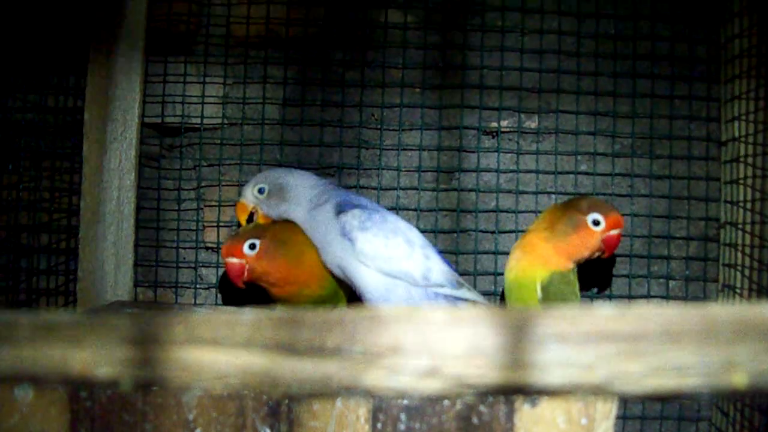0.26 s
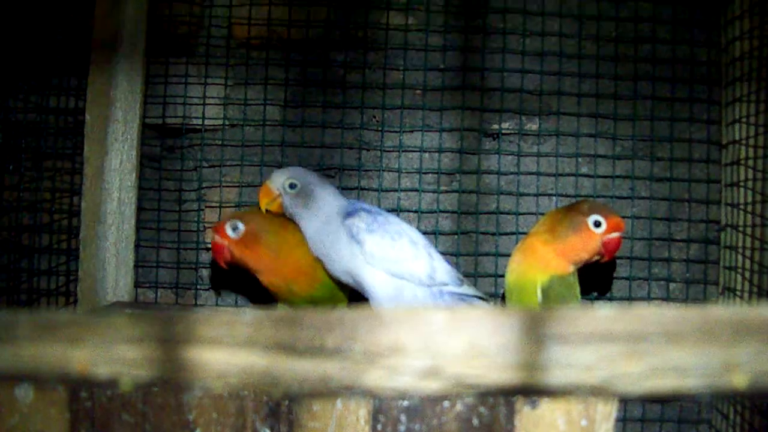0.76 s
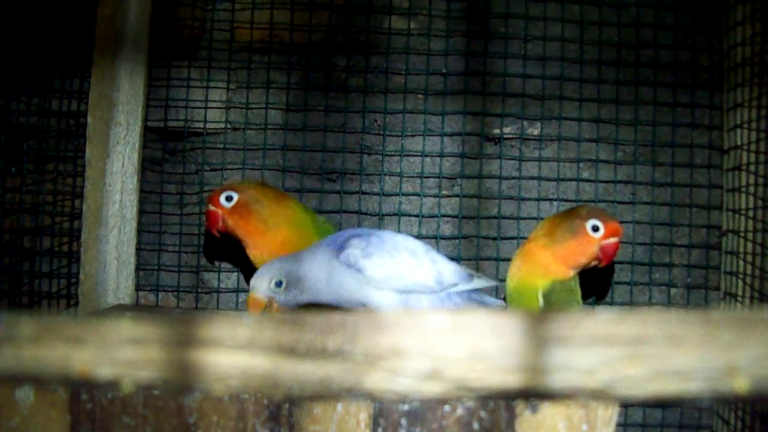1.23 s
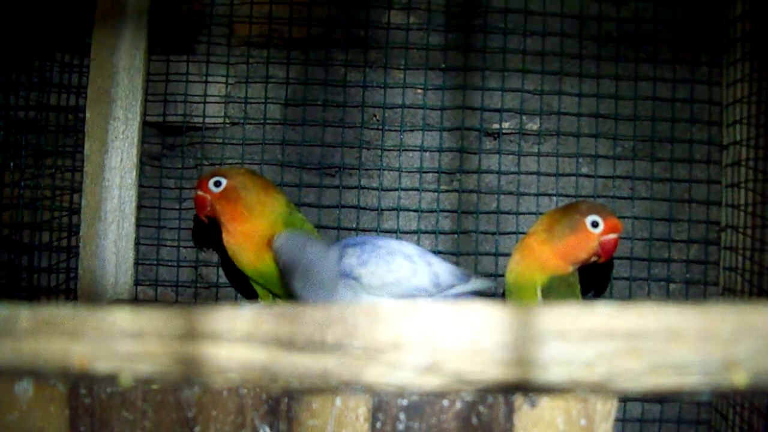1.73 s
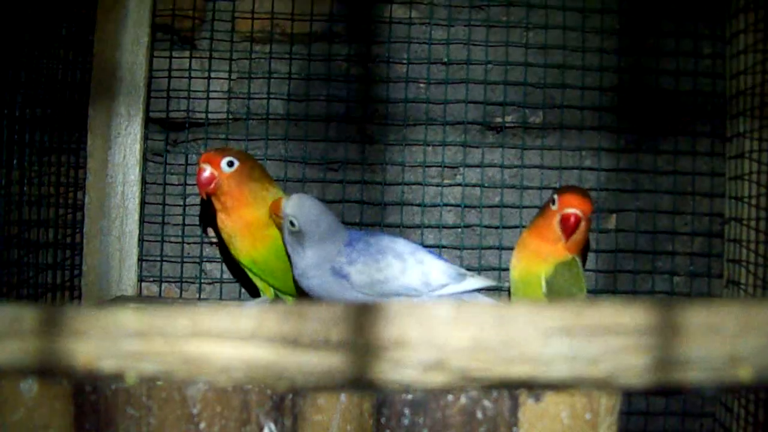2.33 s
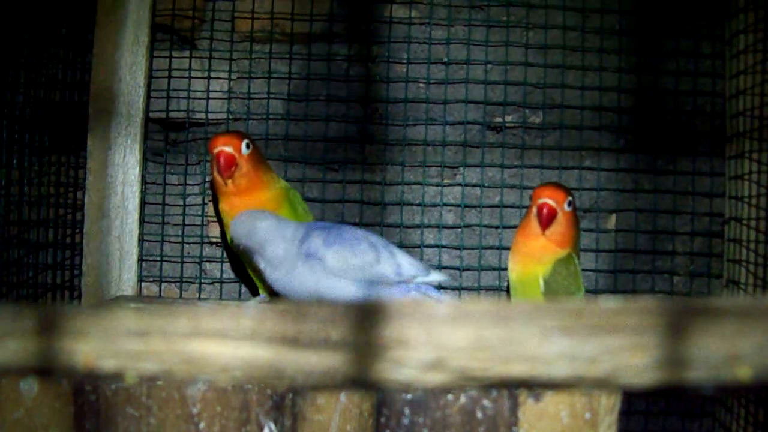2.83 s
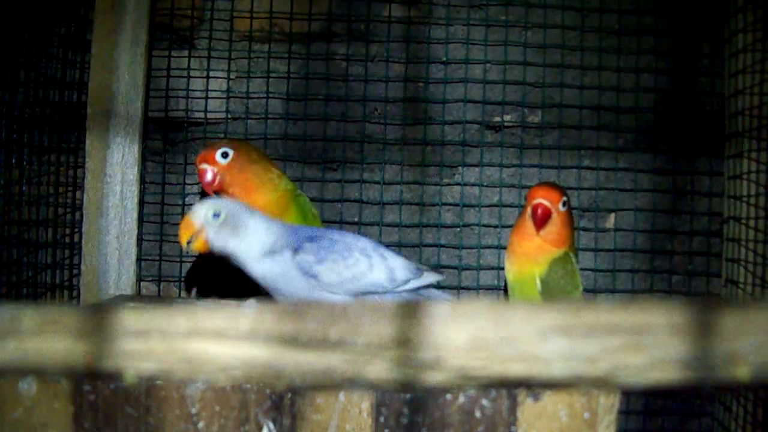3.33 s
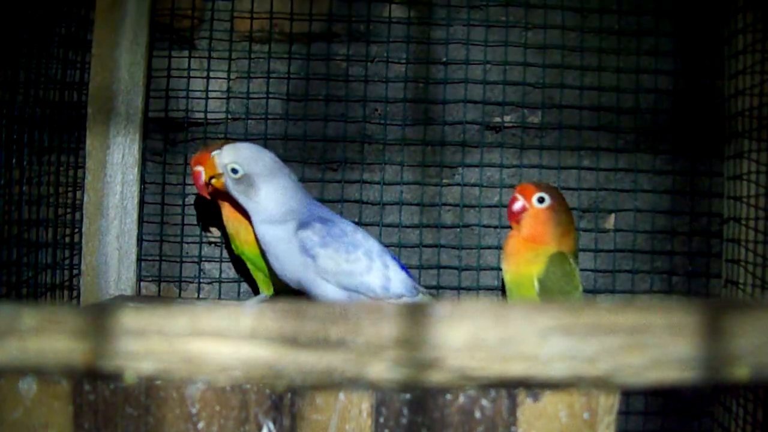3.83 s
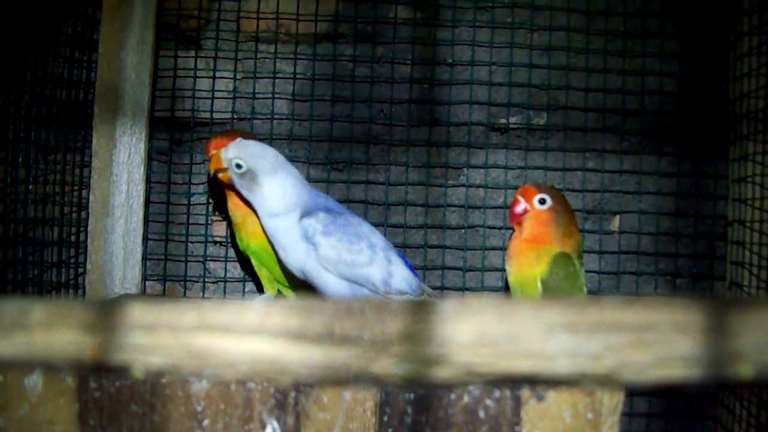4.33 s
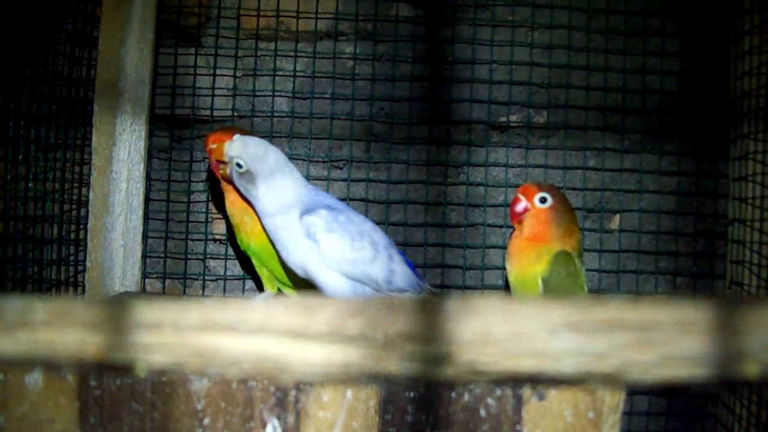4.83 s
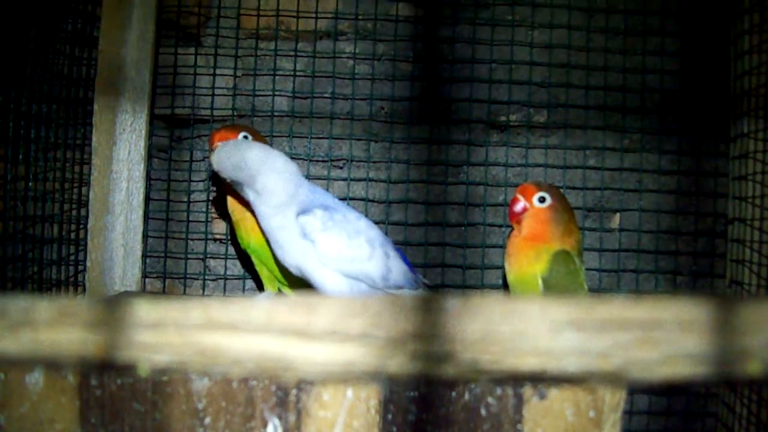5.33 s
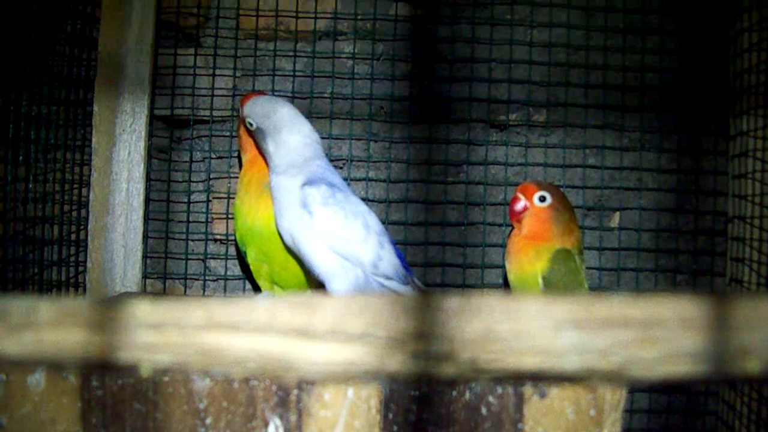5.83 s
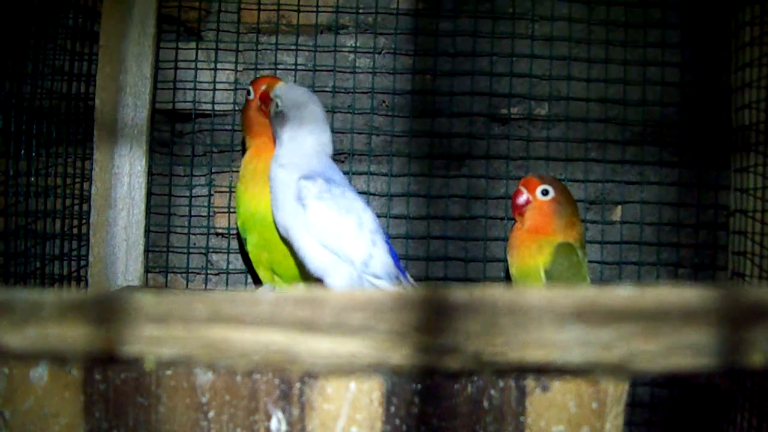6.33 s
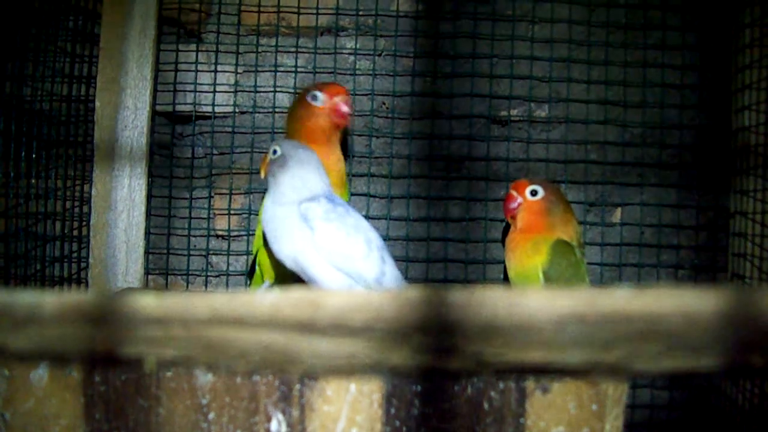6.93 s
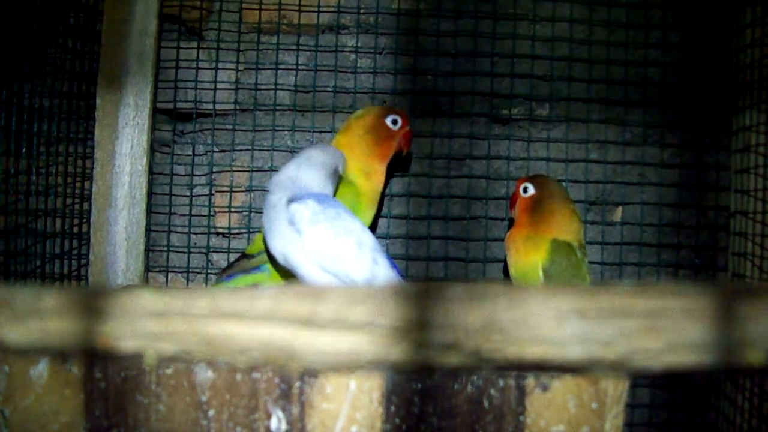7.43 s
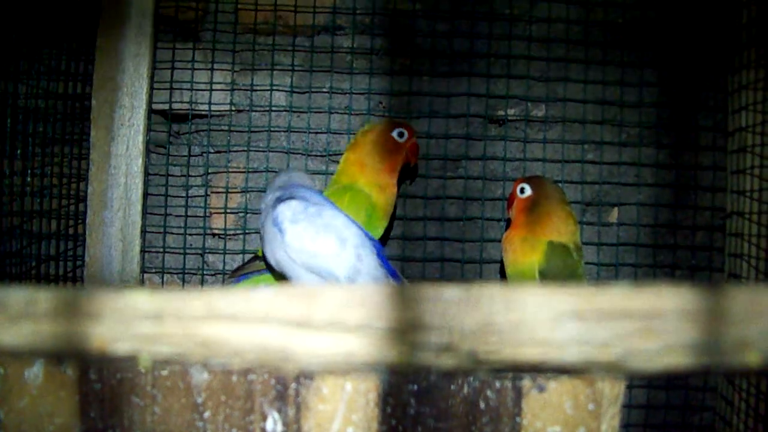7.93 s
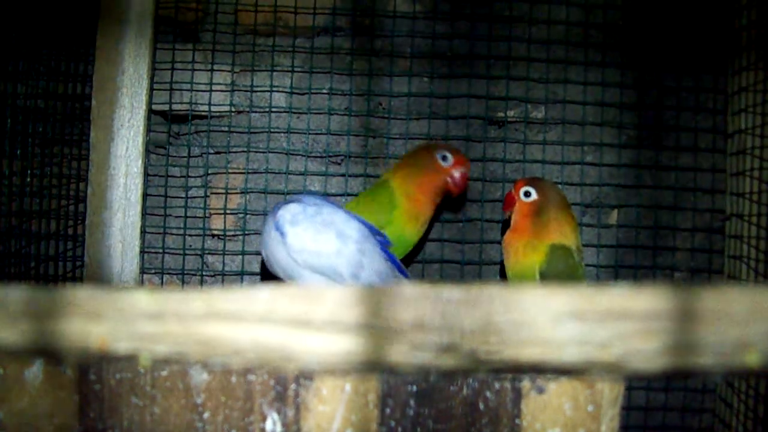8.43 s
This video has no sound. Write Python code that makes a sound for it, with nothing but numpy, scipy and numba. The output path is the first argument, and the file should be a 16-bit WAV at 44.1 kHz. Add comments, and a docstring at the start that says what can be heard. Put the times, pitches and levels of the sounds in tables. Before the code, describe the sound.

A constant airy hiss with a little low rumble fills a small indoor space, swelling gently throughout. From 0 to 0.7 s, lovebirds in a wire cage give quick, overlapping raspy and hoarse chirps, modest in level, around two to four kilohertz. From 0.9 to 1.5 s cleaner chirps and tiny whistles join, one brighter blip near 1.05 s. Then the birds almost fall silent, with faint puffs of rustling and only a weak whistle near 2.85 s. At 4.0 s a small dull knock sounds on the wooden perch, and at 4.1 s a sudden, much louder flurry of shrill, scratchy squeaks bursts out for about 0.25 s. The automatic level dips, softer chirps tumble on until 4.75 s, and the hiss recovers. Sparse faint calls follow near 5.7, 6.3, 6.6, 7.1 and 7.75 s; hiss continues to 8.7 s. Notes have a short room tail and thin camera-microphone colour.

```python
"""Lovebirds chirp in a wire cage indoors; sine partials with unsteady pitch and level make every note. Raspy
and hoarse notes open, pure whistles and chirps join near 1 s, then the birds almost fall silent. A foot knocks
the perch just before a loud flurry at 4.1 s; the camera's gain ducks under it and recovers. Sparse calls close
the scene. Notes ring briefly in the room over a slowly swelling airy hiss of shaped noise, with faint puffs of
high noise: rustling and the blurred treble of distant chatter. A notched microphone and a low sampling rate
with mirror images colour all."""
import sys
import numpy as np
from scipy import signal
from scipy.fft import rfft, irfft, next_fast_len
from scipy.io import wavfile
from scipy.ndimage import uniform_filter1d
from numba import njit

SR = 44100
rng = np.random.default_rng(int(sys.argv[2]) if len(sys.argv) > 2 else 0)


def gain_from_db(level_db):
    """Convert decibel levels to linear amplitude factors (20 dB per decade)."""
    decades = np.asarray(level_db, float) / 20
    return 10 ** decades


def file_out(sig):
    """Save sig as 16-bit WAV at sys.argv[1]."""
    # one column per channel
    cols = np.atleast_2d(sig).T
    # limit, then scale
    lim = np.clip(cols, -1, 1)
    pcm = np.round(lim * 32767).astype(np.int16)
    wavfile.write(sys.argv[1], SR, pcm)


N = 382347


def shape(x, table):
    """Linear filtering: the spectrum is multiplied by a gain interpolated over log frequency (f/Hz, gain/dB)."""
    size = next_fast_len(len(x))
    hz, db = np.transpose(table)
    log_hz = np.log(np.fft.rfftfreq(size, 1 / SR) + 1)
    gain = gain_from_db(np.interp(log_hz, np.log(hz), db))
    return irfft(rfft(x, size) * gain, size)[:len(x)]


def walk(rate_hz, size=N):
    """Low-pass random modulation: values held for 1 / rate, smoothed twice, with a spread near 1."""
    k = int(SR / rate_hz)
    held = np.repeat(rng.standard_normal(size // k + 1), k)
    smooth = uniform_filter1d(uniform_filter1d(held, k), k)
    return 1.464 * smooth[:size]


def syrinx(table, wobble, throb_db, rate_hz, edge_s, breath_db, click_db):
    """Harmonic source: a gliding tone of four partials, modulated in pitch and level, leaks turbulent air."""
    third_db_per_khz, fourth_re_third_db, click_s = -9.5, -5.5, 0.0019
    out = np.zeros(N + SR)
    for s, length, start_hz, end_hz, *levels in table:
        pitch_walk, *level_walks = [walk(rate_hz, size=4096) for _ in range(4)]
        air = np.diff(rng.standard_normal(4097))  # differencing tilts the noise towards the treble
        n = min(int((length + edge_s) * SR), 4096)
        t = np.arange(n) / SR
        hz = np.interp(t, [0, length], [start_hz, end_hz]) * (1 + wobble * pitch_walk[:n])
        phase = 2 * np.pi * np.cumsum(hz) / SR
        # the voice breaks off deeply but swells only a little
        breaks = [np.minimum(c[:n] - 0.45, 0.45) for c in level_walks]
        # the third harmonic weakens as the mean pitch rises, with 2 kHz as reference
        mean_khz = (start_hz + end_hz) / 2000
        levels[2] += third_db_per_khz * (mean_khz - 2)
        levels.append(levels[2] + fourth_re_third_db)
        tone = np.zeros(n)
        for k, db in enumerate(levels):
            tone += gain_from_db(db + throb_db * breaks[k % 3]) * np.sin((k + 1) * phase)
        # air leaks all along and pops as the membrane snaps into the note
        pop = np.exp(-((t - edge_s) / click_s) ** 2)
        leak = gain_from_db(breath_db) + gain_from_db(click_db) * pop
        tone += gain_from_db(max(levels)) * leak * air[:n]
        ramp = np.clip(np.minimum(t, t[-1] - t) / edge_s, 0, 1)
        at = max(int((s - edge_s / 2) * SR), 0)
        out[at:at + n] += np.sqrt(2) * tone * np.sin(ramp * np.pi / 2) ** 2
    return out[:N]


def with_overtones(table, octave_db, third_db):
    """Harmonic spectrum: octave and third harmonic take set levels relative to the fundamental."""
    return [(*row, row[-1] + octave_db, row[-1] + third_db) for row in table]


def clear_notes():
    """Nearly periodic vibration: whistles are almost pure tones, chirps carry a strong octave."""
    # pure whistles: t/s, duration/s, start f/Hz, end f/Hz, fundamental level/dB
    whistle_rows = [(.94, 0.025, 3100, 2852, -42), (1.044, 0.0035, 3520, 3430, -26),
                    (1.063, .007, 3230, 1920, -30.5), (1.069, 0.0095, 2016, 1785, -22),
                    (1.082, 0.012, 1630, 2030, -28), (1.298, 0.02, 2380, 2490, -39.5),
                    (1.38, .023, 3460, 2896, -37.5), (1.455, 0.022, 3230, 3240, -44.5),
                    (2.835, .022, 2900, 2980, -46), (2.857, .028, 2980, 2500, -44.5),
                    (4.127, 0.017, 3760, 3810, -10.5), (4.142, 0.017, 3700, 4050, -7.5),
                    (4.18, .006, 3200, 2300, -24), (4.186, .008, 2310, 2050, -28.5),
                    (4.243, .0073, 2994, 3413, -24), (4.251, 0.025, 3481, 3472, -14.5),
                    (4.31, 0.0091, 2410, 2340, -36.5), (6.638, 0.011, 6440, 6280, -32.5)]
    # full chirps: t/s, duration/s, start f/Hz, end f/Hz, fundamental level/dB
    chirp_rows = [(1.008, .0365, 2880, 3290, -35.5), (1.095, 0.02, 3270, 3260, -32.5),
                  (4.078, .0254, 2300, 2277, -17.5), (4.26, .0071, 2410, 2232, -34),
                  (4.267, .016, 3940, 3600, -13), (4.403, 0.03, 2530, 2860, -32),
                  (4.46, 0.031, 2860, 2890, -30), (4.548, .024, 2074, 2160, -35),
                  (4.597, .028, 2150, 2003, -33.5)]
    table = with_overtones(whistle_rows, octave_db=-18.5, third_db=-18.5)
    table += with_overtones(chirp_rows, octave_db=-4, third_db=-8.5)
    return syrinx(table, wobble=0.0082, throb_db=4.0, rate_hz=258, edge_s=0.0037,
                  breath_db=-27.0, click_db=-13.0)


def harsh_notes():
    """Irregular vibration: fast random modulation roughens notes held on one pitch."""
    # harsh notes: t/s, duration/s, f/Hz, fundamental level/dB, octave level/dB
    harsh_rows = [(.005, 0.059, 2400, -53, -28.5), (.01, 0.036, 2670, -50, -38),
                  (0.045, 0.037, 2845, -45, -29), (.085, 0.042, 2925, -44.5, -39.5),
                  (0.131, .028, 3410, -36.5, -40), (.145, .02, 2340, -60, -36),
                  (0.167, 0.042, 2560, -41, -36), (0.168, .028, 3370, -39, -44),
                  (0.245, 0.014, 3275, -37.5, -39), (.243, 0.044, 2370, -56, -41),
                  (0.317, 0.015, 2750, -45, -38), (0.353, 0.023, 2730, -38.5, -53),
                  (0.418, 0.058, 2383, -40, -29), (0.491, 0.032, 2900, -38.5, -44.5),
                  (.615, .018, 3234, -38.5, -32.5), (0.633, 0.044, 2176, -37, -54),
                  (0.638, 0.029, 3190, -61, -39.5), (0.869, 0.029, 3630, -50, -48),
                  (1.047, .011, 2450, -60, -35.5), (1.228, 0.058, 2235, -42, -58),
                  (1.315, 0.052, 2270, -42, -57), (1.397, .025, 3660, -51, -47.5),
                  (4.101, .013, 2920, -24, -16), (4.105, 0.0086, 2530, -33, -11.5),
                  (4.112, .013, 3630, -9, -15.5), (4.158, .009, 3200, -44, -8),
                  (4.167, 0.0056, 3156, -43, -6), (4.172, .005, 2610, -38, -8.5),
                  (4.176, 0.0075, 2526, -29, -6), (4.281, 0.014, 3210, -13, -15.5),
                  (4.292, 0.014, 3930, -16, -27), (4.307, 0.047, 3200, -40.5, -59),
                  (4.335, .021, 3850, -32, -35), (4.493, 0.032, 3676, -41, -36),
                  (4.573, 0.014, 2615, -46, -25.5), (4.611, 0.034, 3040, -50, -44),
                  (5.72, 0.033, 2850, -62, -52.5), (6.273, 0.043, 2894, -37.5, -37),
                  (6.315, 0.033, 2840, -45, -47), (6.586, 0.0065, 3085, -49.5, -40.5)]
    third_db = -11  # relative to the fundamental
    table = [(s, length, hz, hz, db, octave_db, db + third_db)
             for s, length, hz, db, octave_db in harsh_rows]
    return syrinx(table, wobble=0.038, throb_db=4.5, rate_hz=800, edge_s=0.004,
                  breath_db=-14.0, click_db=-11.0)


def soft_notes():
    """Breathy phonation: gradual edges and strong air leakage make gliding notes hoarse."""
    # soft hoarse notes: t/s, duration/s, start f/Hz, end f/Hz, fundamental level/dB
    soft_rows = [(0.0, 0.01, 2140, 2250, -28.5), (.338, 0.0198, 3610, 3440, -37),
                 (.378, 0.0407, 2540, 2365, -31.5), (.38, 0.048, 3631, 3610, -37.5),
                 (.46, 0.045, 2385, 2280, -37.5), (.515, 0.021, 3740, 3730, -40),
                 (.89, 0.031, 1960, 1905, -43.5), (4.415, .039, 2126, 2736, -25.5),
                 (4.44, .021, 3240, 3940, -21.5), (4.485, 0.038, 2300, 2360, -38),
                 (4.655, .02, 3579, 3671, -38), (4.675, 0.03, 3270, 2710, -34),
                 (4.7, .025, 2500, 2310, -33.5), (4.725, .025, 2484, 2810, -32.5),
                 (5.69, .04, 3125, 2640, -42.5), (6.6, 0.037, 2930, 4037, -42),
                 (6.652, .033, 5850, 4420, -41.5), (6.688, 0.017, 3330, 3536, -43),
                 (7.06, .08, 3390, 3740, -54), (7.735, 0.033, 3590, 3560, -45.5)]
    table = with_overtones(soft_rows, octave_db=-6, third_db=-12.5)
    return syrinx(table, wobble=0.037, throb_db=6.0, rate_hz=450, edge_s=0.01,
                  breath_db=-11.0, click_db=-14.0)


def perch():
    """Modal excitation: a foot's knock sets off decaying sine modes of the wooden perch."""
    # knocks of a foot: t/s, level/dB
    knock_rows = [(3.984, -29)]
    # modes of the wood: f/Hz, level/dB, t60/s
    wood_modes = [(277.75, 4.5, 0.02), (758.8, -5, .04), (1220, -5, 0.033)]
    t, out = np.arange(4096) / SR, np.zeros(N)
    ring = sum(gain_from_db(db - 60 * t / t60) * np.sin(2 * np.pi * hz * t) for hz, db, t60 in wood_modes)
    for s, db in knock_rows:
        at = int(s * SR)
        out[at:at + len(t)] += gain_from_db(db) * ring
    return out


def room(x, wet_db, t60, gap_s=0.002):
    """Diffuse reverberation: cage back and walls answer with a decaying noise tail that shares the energy."""
    t = np.arange(int(0.3 * SR)) / SR
    tail = rng.standard_normal(len(t)) * gain_from_db(-60 * t / t60) * (t > gap_s)
    unit_tail = tail / np.sqrt(np.sum(tail ** 2))
    echo = signal.fftconvolve(x, unit_tail)[:N]
    return (x + gain_from_db(wet_db) * echo) / np.sqrt(1 + gain_from_db(wet_db) ** 2)


def high_puffs():
    """Decaying noise bursts: quick-onset puffs of high noise, rustling and the blurred treble of far chatter."""
    # puffs of high noise: t/s, level before the filter/dB
    puff_rows = [(0.0, -43), (.136, -34.5), (.242, -40.5), (.4, -64), (1.72, -44), (2.0, -42), (2.6, -46),
                 (2.885, -42.5), (3.15, -39.5), (3.68, -49), (3.876, -44), (4.2, -41), (4.301, -38),
                 (4.4, -35), (4.55, -36), (6.39, -42.5), (6.75, -49), (7.49, -42), (7.968, -43.5),
                 (8.25, -42)]
    # colour of the puffs: f/Hz, gain/dB
    puff_colour = [(2000, -33), (4500, -2.5), (7000, 3)]
    attack_s, t60_s = 0.0025, 0.35
    t, out = np.arange(16384) / SR, np.zeros(N + SR)
    for s, db in puff_rows:
        envelope = np.minimum(t / attack_s, 1) * gain_from_db(db - 60 * t / t60_s)
        at = int(s * SR)
        out[at:at + len(t)] += rng.standard_normal(len(t)) * envelope
    return shape(out[:N], puff_colour)


def hiss():
    """Band-wise modulated noise: the bass stays even, the middle swells, the top follows a little and flickers."""
    # hiss of the room at the microphone: f/Hz, relative spectral density/dB
    air_spectrum = [(15, 3), (25, -3), (110, 1), (180, -9.5), (270, -5.5), (390, -7.5), (450, -5.5),
                    (600, -7.5), (780, -3.5), (1060, -6.5), (1480, -7.5), (1800, -11), (2300, -12.5),
                    (3000, -19), (5000, -24.5), (8000, -23.5)]
    # slow swelling and sinking of the hiss: t/s, gain/dB
    swell_rows = [(0, -1), (.6, 1), (1.2, 0), (2.2, 2), (2.6, -1), (3.1, 1.5), (3.8, -2.5), (4.0, 1.5),
                  (4.3, 0.5), (4.8, 2), (5.7, -1), (6.4, 1), (7.1, -1), (7.5, 2), (7.8, 0), (8.1, -0.5),
                  (8.3, 3), (8.67, -1.5)]
    air = shape(rng.standard_normal(N), air_spectrum)
    air *= gain_from_db(-36.5) / np.std(air)  # rms level in dB ahead of the band gains
    swell_db = np.interp(np.arange(N) / SR, *np.transpose(swell_rows))
    bass = shape(air, [(250, -2.0), (500, -31.0)])
    treble = shape(air, [(2500, -17.5), (4500, 2.0)])
    middle = air - bass - treble
    middle_db = swell_db + 1.05 * walk(14)
    treble_db = -1.2 + 0.35 * swell_db + 0.73 * walk(18)
    return bass + middle * gain_from_db(middle_db) + treble * gain_from_db(treble_db)


def scene():
    """Superposition: birds and perch in the room, over puffs and hiss; soft notes sound from farther off, so
    echo more."""
    near = clear_notes() + harsh_notes() + perch()
    away = soft_notes()
    birds = room(near, wet_db=-8.0, t60=0.11) + room(away, wet_db=-2.5, t60=0.22)
    return (birds + high_puffs() + hiss())[None]


def microphone(x):
    """Port resonance: the response peaks at the resonance and has a deep notch beneath it."""
    # response of the microphone port: f/Hz, gain/dB
    port_response = [(1500, 0.5), (3000, 0.5), (3600, -4.5), (3950, -12), (4210, -24), (4500, -8.5),
                     (4900, -3), (6200, 4.5), (7100, 3), (7900, -2), (8050, -17), (8400, -75)]
    return shape(x, port_response)


@njit
def duck(peak, limit, attack, hold, quick, slow):
    """Gain-control law (pull 0-1): loud peaks pull, it holds, then one part decays fast and one falls evenly."""
    out, a, b, wait = np.zeros((2, len(peak))), 0., 0., 0.
    for i in range(len(peak)):
        if peak[i] > limit:
            a, b, wait = a + attack * (1 - a), b + attack * (1 - b), hold
        elif wait > 0:
            wait -= 1
        else:
            a, b = a * (1 - quick), max(b - slow, 0.)
        out[0, i], out[1, i] = a, b
    return out


def gain_control(x):
    """Feed-forward compression: short-term loudness above a limit lowers the gain by two summed pulls."""
    limit_db, quick_db, slow_db = -13.0, -7.5, -2.5
    attack_s, hold_s, quick_s, slow_s = 0.0089, 0.892, 0.04, 1.22
    # peak level of a sine with the same short-term power
    loudness = np.sqrt(2 * uniform_filter1d(x ** 2, size=200) + 1e-12)
    quick_pull, slow_pull = duck(loudness, float(gain_from_db(limit_db)), 1 / (attack_s * SR), hold_s * SR,
                                 1 / (quick_s * SR), 1 / (slow_s * SR))
    return x * gain_from_db(quick_db * quick_pull + slow_db * slow_pull)


def mirror_image(x):
    """Spectral imaging: every tone reappears as far above half the sampling rate as it lies below."""
    # what the playback filter lets through of the image: f/Hz, gain/dB
    image_filter = [(7700, -63), (8000, 0.5), (8740, -11), (9450, -23), (10200, -42.5), (10400, -50),
                    (10600, -76.5)]
    camera_rate_hz = 16000
    image = 2 * x * np.cos(2 * np.pi * camera_rate_hz * np.arange(N) / SR)
    return shape(image, image_filter)


def band_limit(x):
    """A steep low-pass at the top of the band."""
    return signal.sosfilt(signal.butter(12, 10370, fs=SR, output="sos"), x)


def record(dry):
    """Signal chain: microphone colour, gain control, then the mirror image of a low sampling rate."""
    x = gain_control(microphone(dry[0]))
    mix = (x + mirror_image(x))[None]
    return band_limit(mix)


dry = scene()
out = record(dry)
file_out(out)
```